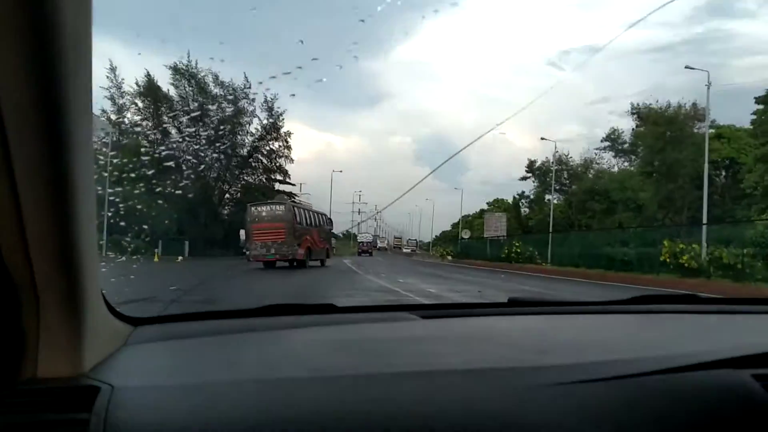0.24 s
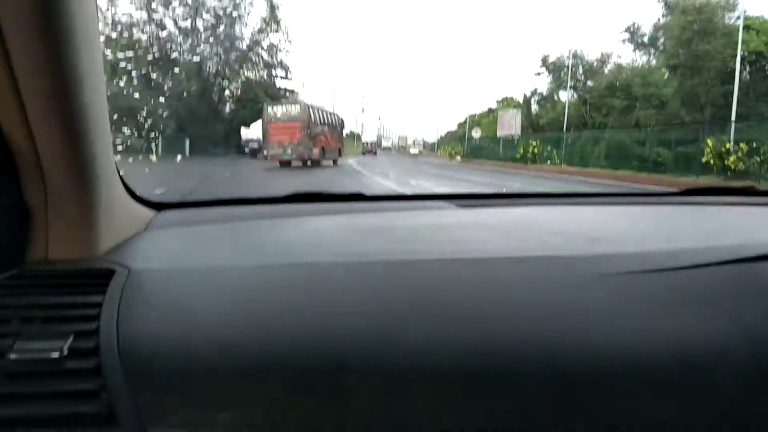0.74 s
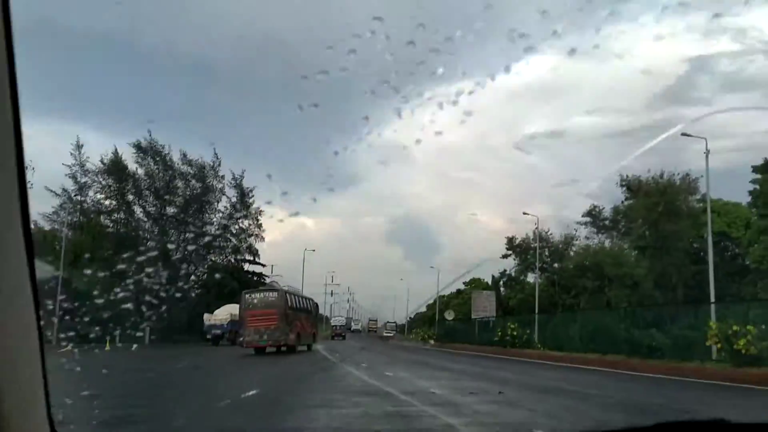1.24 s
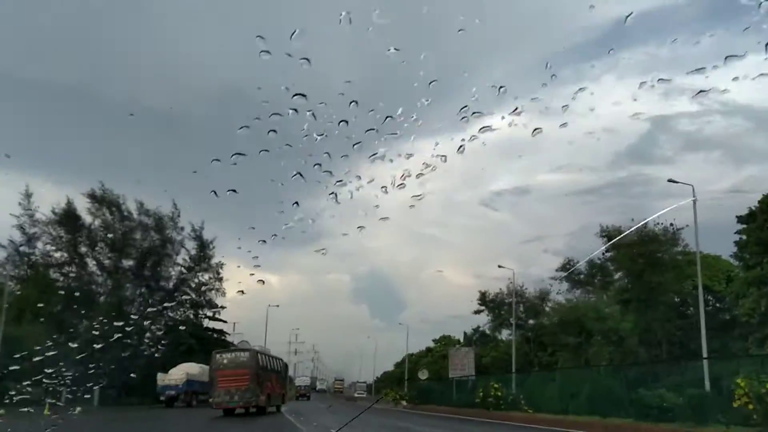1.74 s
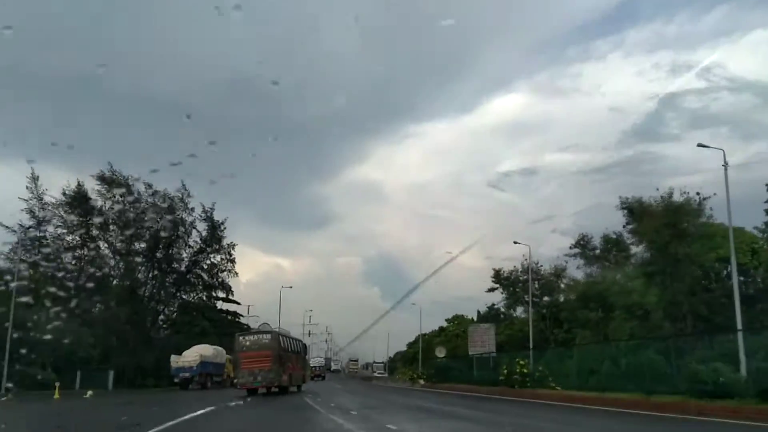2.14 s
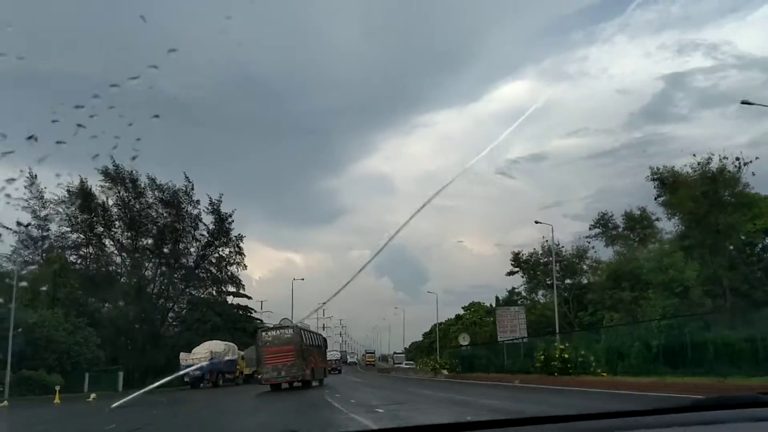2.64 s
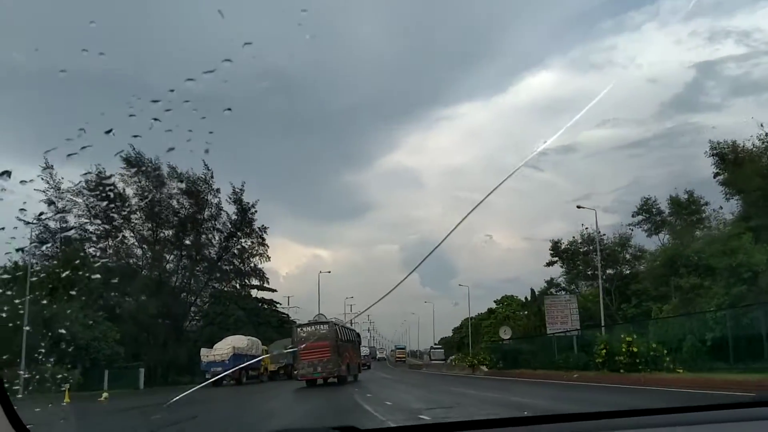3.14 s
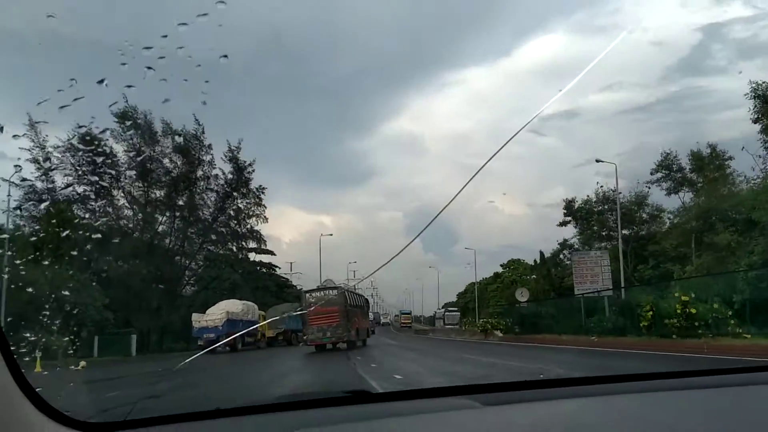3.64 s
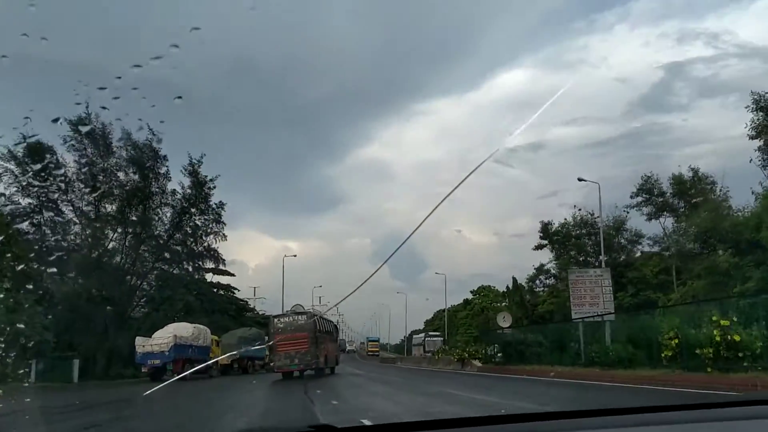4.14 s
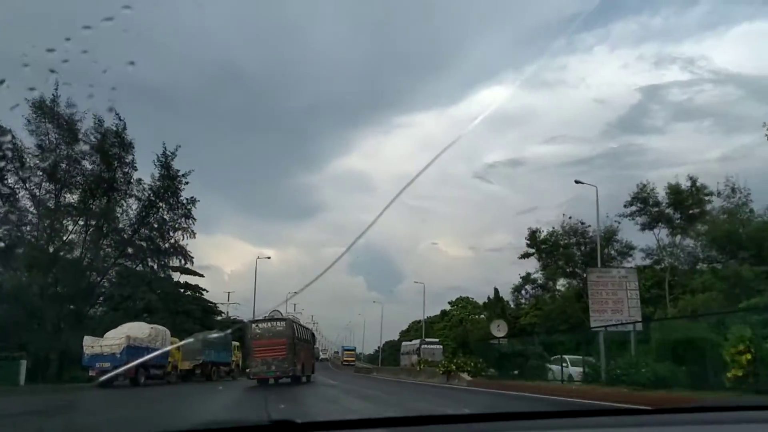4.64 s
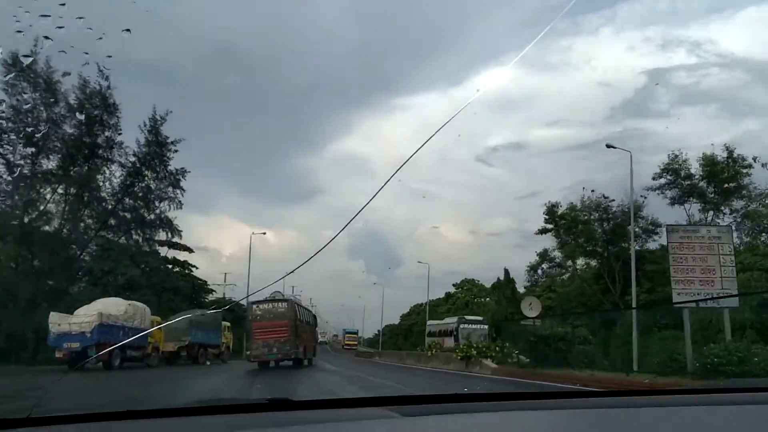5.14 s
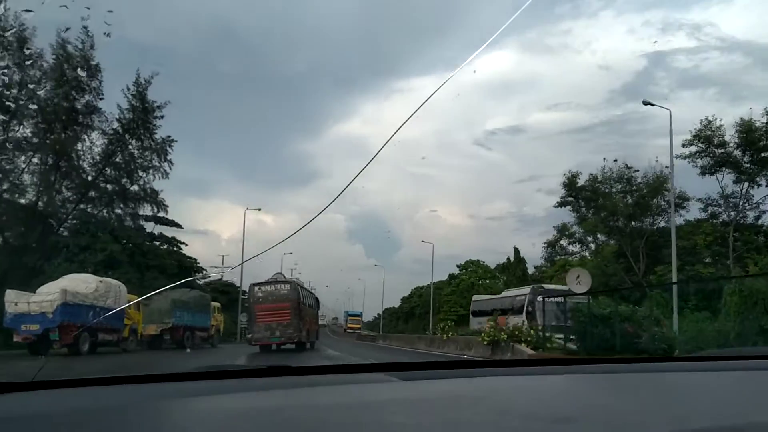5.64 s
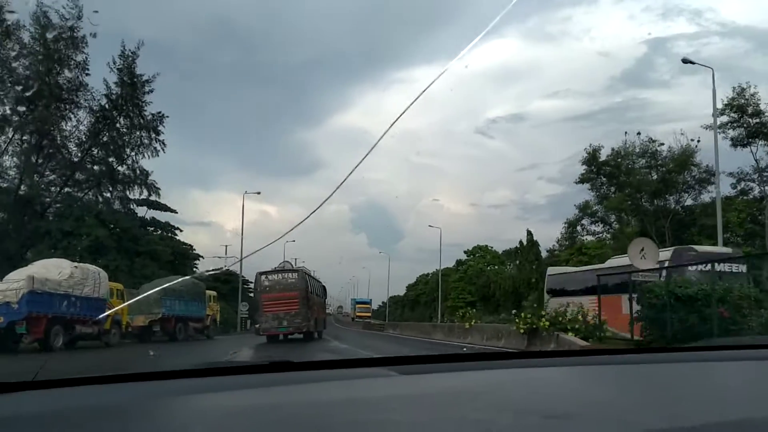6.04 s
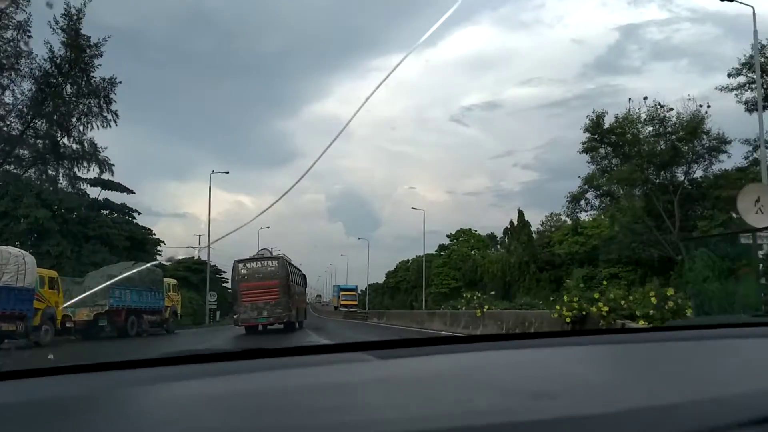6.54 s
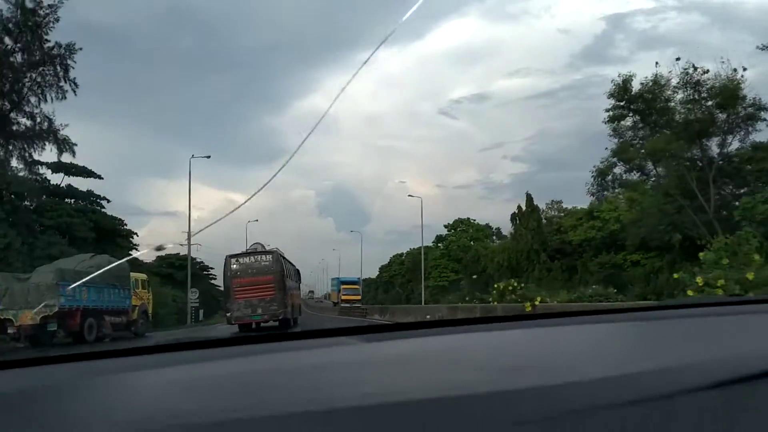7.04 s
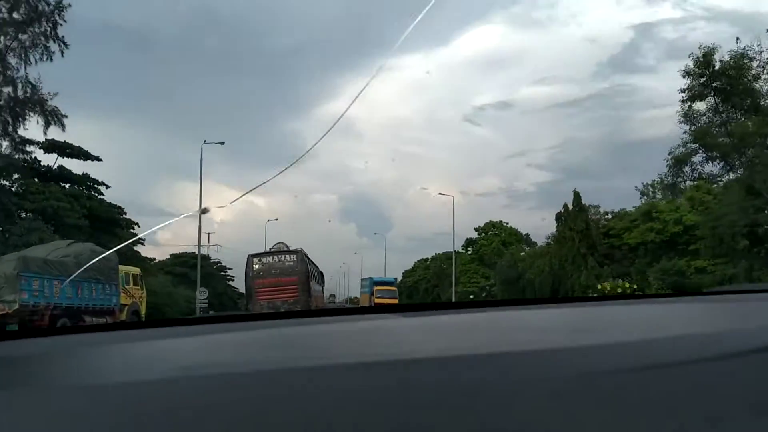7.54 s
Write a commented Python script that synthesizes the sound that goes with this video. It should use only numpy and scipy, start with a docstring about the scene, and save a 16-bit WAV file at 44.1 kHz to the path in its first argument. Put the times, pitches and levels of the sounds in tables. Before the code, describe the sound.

Car cabin road noise with a low engine hum; the car's own two-tone horn gives a single toot, a quick double, and later a longer one.

```python
"""Inside a car on a wet highway, heard by a hand-held phone with two microphone ports.
Shaped noise (tyre rumble, road roar, spray hiss) and a wavering engine hum run throughout. A far horn,
a thin stack of sines, sounds early on, with one brief far tone near 600 Hz. The car's two electric horns,
buzzing stacks with an echo, toot three times briefly as the phone is turned; another far horn, then one
long toot follow. Late on come low thumps and a passing vehicle's throbs and hum. A few things tick."""
import sys
import numpy as np
from scipy import signal
from scipy.fft import rfft, irfft
from scipy.io import wavfile
from scipy.ndimage import uniform_filter1d

SR = 44100
rng = np.random.default_rng(int(sys.argv[2]) if len(sys.argv) > 2 else 0)


def wav_out(sig):
    """Save sig, one row per channel (or a flat mono array), as 16-bit PCM at SR to the path in sys.argv[1]."""
    wavfile.write(sys.argv[1], SR, np.round(np.clip(np.atleast_2d(sig).T, -1, 1) * 32767).astype(np.int16))


N = 343539
STEP = 32  # samples between points of slow controls


def gain_of(db):
    """Decibels to a factor."""
    return 10 ** (np.asarray(db) / 20)


def evened(x):
    """Scales to rms 1."""
    return x / np.sqrt(np.mean(x ** 2) + 1e-20)


def read(points, hz, axis=1):
    """One column of a table, joined by straight lines on a log-frequency axis."""
    rows = np.transpose(points)
    return np.interp(np.log(hz + 1), np.log(rows[0] + 1), rows[axis])


def add(mix, s, sound):
    """Mixes a two-channel sound in at time s."""
    part = mix[:, round(s * SR):][:, :sound.shape[1]]
    part += sound[:, :part.shape[1]]


def stretched(slow):
    """Joins control points by straight lines at the full sample rate."""
    ramp = np.arange(STEP) / STEP
    lines = slow[..., :-1, None] + np.diff(slow)[..., None] * ramp
    return lines.reshape(slow.shape[:-1] + (-1,))


def wander(shape, hz):
    """Slow random curves of rms 1, one point a STEP, that change about hz times a second."""
    settling = 300  # points dropped while the filter settles
    raw = rng.standard_normal(shape[:-1] + (shape[-1] + settling,))
    smooth = signal.lfilter(*signal.butter(2, hz * 2 * STEP / SR), raw)
    return evened(smooth[..., settling:])


def paired(shape, hz, likeness):
    """Slow curves for both ports, alike by the given share."""
    a, b = wander((2,) + shape, hz)
    return np.array([a, likeness * a + np.sqrt(1 - likeness ** 2) * b])


# a toot builds up, sags while held, then rings out
ATTACK_S, ATTACK_DB, SAG_DB_PER_S = 0.022, -12, -9
RELEASE_DB_PER_S, RING_S = -400, 0.046
FALTER_AT_S, FALTER_DB, FALTER_HALF_S = 5.157, -8, .013  # the long toot dips briefly


def swing(t, start, held, db):
    """Loudness of one toot at times t from its start: attack, slow sag, ring-out."""
    level_db = db + ATTACK_DB * np.clip(1 - t / ATTACK_S, 0, 1) + SAG_DB_PER_S * t
    level_db = level_db + RELEASE_DB_PER_S * np.maximum(t - held, 0)
    level_db = level_db + FALTER_DB * np.exp(-((t + start - FALTER_AT_S) / FALTER_HALF_S) ** 2)
    opening = np.clip(t / 0.0032, 0, 1)
    closing = np.clip((held + RING_S - t) / 0.0069, 0, 1)
    return gain_of(level_db) * closing * opening


def lingering(size, t60):
    """A loudness curve smeared by an exponential tail that falls 60 dB in t60 seconds."""
    keep = gain_of(-2 * 60 / t60 * STEP / SR)  # power kept from one point to the next
    return np.sqrt(signal.lfilter([1 - keep], [1, -keep], size ** 2))


TURN_S = (1.07, 4.06)  # the phone is turned during this span
# how the two ports hear each pitch: (f/Hz, left-right likeness 0-1, left leads/rad)
PORTS = [(100, 0.92, 0.2), (400, 0.94, -0.13), (920, 0.91, 0.1), (1310, 1, 0.53), (1462, 0.22, 2.1),
         (1780, 0.13, -4), (2180, 0.1, -1), (2630, 0.88, -3), (2905, 1, -4.5), (3130, 0.93, -5.5),
         (3680, 0.38, -3), (3800, 0.93, -2.5), (3870, 0.96, -3.1), (4250, 0.2, -7), (7100, 0, 2.5)]
# balance between the ports before the turn and since: (f/Hz, left minus right/dB)
BEFORE = [(60, -3), (110, 2), (200, 4), (380, -11), (700, 6.5), (1290, 1.5), (2380, 6), (4400, 2),
          (8120, -0.5), (15000, 4)]
SINCE = [(60, -8), (110, -3.5), (200, -5), (380, 0.5), (700, 0.5), (1290, 5.5), (2380, 7.5), (4400, 1.5),
         (8120, 2.5), (15000, 16)]


def noise(size, before, since, level, patchy_db, gusty_db):
    """Random short-time spectra with drifting patches and wide gusts, through both ports, at a level curve."""
    hop = size // 4
    frames, hz = N // hop + 5, np.fft.rfftfreq(size, 1 / SR)
    frame_s = np.arange(frames) * hop / SR
    turned = np.clip((frame_s - TURN_S[0]) / (TURN_S[1] - TURN_S[0]), 0, 1)

    def blend(old, new):
        return np.outer(old, 1 - turned) + np.outer(new, turned)

    colour = gain_of(blend(read(before, hz), read(since, hz)))
    a, b, c, d, patches = rng.standard_normal((frames, len(hz), 5)).T
    patches = evened(uniform_filter1d(uniform_filter1d(patches, 10, 0), 8, 1))
    gusts = evened(uniform_filter1d(rng.standard_normal(frames), 8))
    # the right port hears partly the left's noise, shifted, and partly its own
    same = np.clip(read(PORTS, hz), 0, 1)[:, None]
    lag = np.exp(-1j * read(PORTS, hz, axis=2))[:, None]
    left = a + 1j * b
    right = same * left * lag + np.sqrt(1 - same ** 2) * (c + 1j * d)
    pan_db = blend(read(BEFORE, hz), read(SINCE, hz))
    spectra = np.array([left * gain_of(pan_db / 2), right * gain_of(-pan_db / 2)])
    spectra *= colour / np.linalg.norm(colour, axis=0)  # only the shape of the colour counts
    spectra *= gain_of(patchy_db * patches + gusty_db * gusts)
    sound = signal.istft(spectra, nperseg=size, noverlap=size - hop)[1]
    return sound[:, :N] * stretched(level)[:N]


# how loud the road is: (t/s, tyre rumble level/dB, road roar level/dB, spray hiss level/dB)
ROAD = [(0, -36.5, -39, -39), (.45, -33.5, -36, -38), (.95, -38, -39, -40), (1.6, -36, -38, -37),
        (2.1, -35.5, -36.5, -38), (2.4, -38.5, -44, -44.5), (3.1, -39.5, -44.5, -49),
        (4.0, -39.5, -45, -52), (5.0, -37, -42.5, -54), (5.3, -37, -39.5, -45.5), (5.8, -36.5, -40, -50),
        (6.5, -34.5, -39, -48), (6.8, -34, -37, -46), (7.0, -30, -34, -41.5), (7.25, -32, -34, -39),
        (7.45, -33.5, -35.5, -41), (7.6, -35, -35.5, -45.5), (7.79, -36.5, -38, -48)]
# colours of the noises, only relative: (f/Hz, level/dB); a pair is before and since the turn
RUMBLE = [(24, -52), (40, -3.5), (70, -23), (90, -0.5), (118, 5.5), (162, -3.5), (258, -3.5), (391, -14),
          (415, -6.5), (450, -27), (580, -17), (990, -120)], [(24, -79), (40, -16.5), (68, -29.5), (92, 1),
          (200, -6.5), (248, -4), (277, -11.5), (313, -4), (391, -11), (450, -14.5), (580, -59),
          (990, -120)]  # pair
ROAR = ([(150, -48), (420, -3.5), (600, 0.5), (1000, -3.5), (1250, -3), (1650, -2.5), (2200, -1.5),
        (2700, -8), (3500, -37), (6000, -90)], [(150, -34), (420, -4), (600, 0), (1050, -2), (1250, -6.5),
        (1650, -3.5), (2200, -10.5), (2700, -16), (3500, -37), (6000, -92)])  # pair
HISS = [(1000, -59), (1800, -33), (2600, -1), (3300, -4.5), (3850, -3), (4300, -4), (6000, -4.5),
        (7900, -9), (8250, -48), (9500, -82)]
AIR = ([(7000, -72), (7800, -32), (8500, -3.5), (9300, -2.5), (11000, -6.5), (13000, -12), (14500, -15),
       (15500, -30)], [(7000, -72), (7800, -30), (8500, -11.5), (9300, -8.5), (11000, -14.5), (12500, -22),
       (13500, -24), (15500, -51)])  # pair
# a narrow hum in the traffic alongside, relative: (f/Hz, level/dB)
DRONE = [(400, -90), (570, -2.5), (625, -2.5), (900, -120)]
DRONE_AT_S, DRONE_HALF_S, DRONE_DB = 6.91, 0.16, -43  # its one swell
AIR_DB, AIR_FOLLOWS = -64, 1.16  # top air at -40 dB of hiss, and dB it moves for each dB of hiss
SHAKE_DB = -15  # the horns shake the bodywork: low rumble under the toot
# the horn also comes back as noise scattered by the roadside: dB relative to the toot
SCATTER_ROAR_DB, SCATTER_HISS_DB, SCATTER_T60_S = -13.5, -7, 0.71


def road():
    """Tyre rumble, road roar, spray hiss, thin top air and a passing hum; scattered horn sound swells them."""
    t = np.arange(0, N + 2 * STEP, STEP) / SR
    times, *levels_db = np.transpose(ROAD)
    rumble, roar, hiss = (gain_of(np.interp(t, times, db)) for db in levels_db)
    for start, held, db, treble_db, *_ in TOOTS:
        scatter = lingering(swing(np.maximum(t - start, 0), start, held, db), SCATTER_T60_S)
        rumble = np.hypot(rumble, gain_of(SHAKE_DB) * scatter)
        roar = np.hypot(roar, gain_of(SCATTER_ROAR_DB) * scatter)
        hiss = np.hypot(hiss, gain_of(SCATTER_HISS_DB + treble_db) * scatter)
    air = gain_of(AIR_DB) * (100 * hiss) ** AIR_FOLLOWS
    drone = gain_of(DRONE_DB) * np.exp(-((t - DRONE_AT_S) / DRONE_HALF_S) ** 4)
    mix = noise(1024, DRONE, DRONE, drone, patchy_db=2.5, gusty_db=4.0)
    mix += noise(4096, *RUMBLE, rumble, patchy_db=2.0, gusty_db=1.5)
    mix += noise(1024, *ROAR, roar, patchy_db=0.8, gusty_db=0.68)
    mix += noise(512, HISS, HISS, hiss, patchy_db=1.56, gusty_db=0.54)
    mix += noise(512, *AIR, air, patchy_db=3.0, gusty_db=-0.5)
    return mix


# the engine's firing rate before its small wavering: (t/s, f/Hz, level/dB)
ENGINE = [(0, 83, -39), (.4, 88, -42.5), (.55, 75, -46), (1.299, 68, -47.5), (2.099, 71.5, -45.5),
          (2.6, 76.5, -49), (3.501, 80.5, -48), (4.3, 83, -55), (5.001, 86, -47), (5.748, 81.5, -48.5),
          (6.5, 76, -51), (7.05, 72, -46), (7.79, 72, -45)]
# tones at whole multiples of the firing rate: (multiple, level/dB added)
ENGINE_ORDERS = [(1, -4), (3, -1), (4, -8), (5, -5.5), (6, -16.5)]
ENGINE_PAN_DB = 1  # left minus right


def engine():
    """A few wavering engine orders that stand out of the rumble as the revs rise and fall."""
    s, hz, db = np.transpose(ENGINE)
    t = np.arange(s[0], s[-1], STEP / SR)
    order, order_db = np.array(ENGINE_ORDERS).T[..., None]
    pitch = np.interp(t, s, hz) * (1 + 0.0044 * wander(t.shape, 3.7))
    size = gain_of(np.interp(t, s, db) + order_db + 4.1 * wander((len(order), len(t)), 1.09))
    turns = np.round(order) * np.cumsum(stretched(pitch)) / SR
    tone = (stretched(size) * np.sin(2 * np.pi * turns)).sum(0)
    return s[0], tone * gain_of(np.array([[.5], [-.5]]) * ENGINE_PAN_DB)


# low thumps over road joints near 110-120 Hz, and short throbs of a passing vehicle near 200-220 Hz:
# (t/s, level/dB before the soft onset and decay, f/Hz, time to fall 60 dB/s)
LOW_BURSTS = [(0.441, -12, 111, 0.13), (6.766, -18, 120, 0.11), (6.961, -13, 115, 0.1),
              (7.14, -21.5, 206, 0.21), (7.285, -17.5, 205, .15), (7.392, -19, 201, .12),
              (7.468, -9.5, 111, 0.15), (7.518, -23, 218, 0.098)]


def low_burst(db, hz, t60):
    """A thump or a throb: a decaying low sine with a soft onset, alike at both ports."""
    t = np.arange(int(.25 * SR)) / SR
    onset = 1 - np.exp(-t / 0.023)
    burst = np.sin(2 * np.pi * hz * t) * onset * gain_of(db - 60 * t / t60)
    return np.array([burst, burst])


# things ticking in the cabin:
# (t/s, snap level/dB before its fade, left minus right/dB, snap's time to fall 60 dB/s, knock level/dB)
TICKS = [(0.339, -30, -16, .012, -40), (3.2891, -38, 3.0, .012, -50), (3.5192, -44.5, 1.5, .01, -55),
         (4.5994, -47.5, 1.0, .01, -55), (6.531, -39, 7, .04, -50), (7.3777, -13, 10, .0045, -19)]
# wide resonances of the trim: (f/Hz, width/Hz, level/dB relative)
TICK_MODES = [(2600, 1800, -6), (4730, 790, 1), (5700, 1200, 0), (7160, 1400, -2), (9450, 3600, -27),
              (13000, 4000, -26)]
KNOCK_HZ, KNOCK_T60_S = 1050, 0.0031  # the panel behind the trim


def tick(db, pan_db, t60, knock_db):
    """A short burst of noise in a few wide modes of the trim, over a dull knock."""
    t = np.arange(2048) / SR
    hz = np.fft.rfftfreq(2048, 1 / SR)
    colour = sum(gain_of(g) / (1 + ((hz - f) / w * 2) ** 4) for f, w, g in TICK_MODES)
    shared, own = rng.standard_normal(2048), rng.standard_normal((2, 2048))
    fade = gain_of(-60 * t / t60) * (1 - np.exp(-t / 0.00071))
    burst = irfft(rfft(shared + 0.82 * own) * colour) * fade
    burst = evened(burst) * np.sqrt(np.mean(fade ** 2))
    knock = np.sin(2 * np.pi * KNOCK_HZ * t) * gain_of(knock_db - 60 * t / KNOCK_T60_S)
    return burst * gain_of(db + np.array([[.5], [-.5]]) * pan_db) + knock


# two far horns and a brief far tone, one table each, before wavering:
# (t/s, f/Hz of the first partial, level/dB, added above third partial/dB)
FAR = [
    [(0, 428.7, -48.5, 0), (.7, 428, -47, 7), (.9, 427, -46, 8), (.94, 427, -48, -6), (.99, 426, -49, -6),
     (1.01, 426, -49, 17), (1.09, 427, -45, 12), (1.15, 427, -41, -0.5), (1.7, 420.5, -48, 1),
     (2.2, 418, -63, -1)],
    [(2.69, 372, -64, 10), (2.72, 375, -51, 10), (2.765, 372, -49, 10), (2.795, 364, -44, 0),
     (2.84, 377, -40, -13), (2.885, 374, -51, -8), (2.96, 370, -54, -14), (3.0, 369, -66, -14)],
    [(.52, 609, -65, 0), (.58, 597, -44, 0), (.64, 594, -43, 0), (.72, 580, -58, 0)],
]
# the partials of each: (partial, level/dB added); the brief tone has only one
FAR_TONE = [
    [(1, -3), (2, -2.5), (3, -3), (4, -5), (5, -14)],
    [(2, 5), (4, -4), (5, -13), (8, -17), (9, -17)],
    [(1, 5.5)],
]


def far_sound(rows, tone):
    """A thin stack of sines, or a single one, that blurs and flutters on its way through traffic."""
    s, hz, db, bright_db = np.transpose(rows)
    t = np.arange(s[0], s[-1], STEP / SR)
    order, tone_db = np.array(tone).T[..., None]
    pitch = np.interp(t, s, hz) * (1 + 0.0049 * wander(t.shape, 23.0))
    turns = np.round(order) * np.cumsum(stretched(pitch)) / SR + rng.random(order.shape)
    # part of the flutter is common to both ports, part is each port's own
    flutter_db = 3.2 * wander((len(tone), len(t)), 30) + 2.0 * wander((2, len(tone), len(t)), 16)
    level_db = np.interp(t, s, db) + (order > 3.5) * np.interp(t, s, bright_db)
    size = gain_of(tone_db + flutter_db + level_db)
    return s[0], (stretched(size) * np.sin(2 * np.pi * turns)).sum(1)


HORN_HZ = (431.8, 503.5)  # the low and the high horn, once settled
HORN_LATE_S = (0.013, 0.00086)  # the heavier low horn speaks a little later
START_FLAT, SETTLE_S = 0.0216, 0.0357  # share of the pitch each toot starts flat by, and how soon it settles
FLUTTER_DB, FLUTTER_GROWTH, FAST_SHARE = 3.2, .015, .3  # wavering, its growth per partial, quick part added
BUZZ = .014  # roughness of a partial for each partial number
ECHO_FUZZ_HZ, ECHO_LOW_HZ = 17, 580  # how fast the echo breaks up; the roadside returns little below
# one row a toot: (start t/s, held/s, level/dB, added above sixteenth partial/dB, roadside echo level/dB,
# echo delay/s, echo's time to fall 60 dB/s, echo flat by/share of pitch, rattle level/dB relative to toot)
TOOTS = [(1.172, 0.096, -20.5, -2.5, -7.5, 0.028, 0.71, 0.0084, -31),
         (1.698, 0.08, -21, -3.5, -4.5, 0.027, 0.3, 0.01, -32),
         (1.878, 0.1, -20.5, -6.5, -9, 0.083, 0.12, .02, -38),
         (5.066, 0.23, -17, -23.5, -9.5, 0.027, 0.11, 0.0074, -19)]
# the horns' colour, one table a toot, as the phone is held then:
# (partial, low horn left level/dB, right level/dB, high horn left level/dB, right level/dB)
BODY = [
    [(1.0, -5.5, -9, -9, -4.5), (2.0, -8.5, -2.5, -4, -8.5), (3.0, -6.5, -5.5, -5, -5),
     (4.0, -12, -5, 2, -6.5), (5.0, -3, -19, -8.5, -18), (6.0, -15, -27.0, -22, -17),
     (7.0, -6, -5.5, -17, -24), (8.0, -10, -25, -27, -24), (9.0, -22, -20, -31.5, -20),
     (10.0, -21, -27, -19.5, -25), (11.0, -18, -28, -28, -12.5), (12.0, -31, -28, -29.5, -31.5),
     (13.0, -18, -17.5, -29.0, -22), (14.0, -9, -23, -23, -15), (15.0, -26.0, -9, -31.5, -17),
     (16.0, -31, -16, -50.0, -35)],
    [(1.0, -15, -11, -2.5, -0.5), (2.0, -7, -2.5, -24, -17), (3.0, -11, -10.5, -2.5, -7),
     (4.0, -2, -0.5, 1.5, -1), (5.0, -2, -15, -3.5, -15), (6.0, -7, -18.5, -29, -28),
     (7.0, -9, -12, -20, -34.5), (8.0, -13, -14, -18, -26), (9.0, -24.0, -21.0, -29, -19),
     (10.0, -22, -17, -22, -31.5), (11.0, -28.5, -23, -23.0, -26), (12.0, -32, -37, -34.5, -37.5),
     (13.0, -10, -16, -27.5, -31), (14.0, -11, -28, -27.0, -28), (15.0, -15, -7.5, -29, -33),
     (16.0, -18, -14, -35, -38.0)],
    [(1.0, -15, -26, -4.5, -2), (2.0, -17.0, -9.5, -12.5, -16), (3.0, -13, -16, -4, 1.5),
     (4.0, 0, -11, -6, -5), (5.0, -4.5, -18, -13, -19), (6.0, -9.5, -31, -26, -33),
     (7.0, -7.5, -15.0, -22, -27.0), (8.0, -23, -18.5, -19, -32.5), (9.0, -18, -23, -17, -26.0),
     (10.0, -31, -24, -23, -33.0), (11.0, -31.0, -22, -23, -35), (12.0, -29, -33.0, -34.5, -29),
     (13.0, -17, -32.0, -33, -34), (14.0, -19, -18, -34, -30), (15.0, -21, -8, -44, -33),
     (16.0, -32.5, -21, -50.0, -46.5)],
    [(1.0, -13.5, -15, -6.5, -7), (2.0, -7.5, -11, -11, -11), (3.0, -10.5, -17, -15, -1),
     (4.0, -11, -11, -8.5, -17), (5.0, -11.5, -21, -16.5, -30.5), (6.0, -12.5, -27.5, -23, -34),
     (7.0, -12, -19, -26, -35), (8.0, -22, -33.0, -32, -43.5), (9.0, -27, -46, -39, -40),
     (10.0, -37, -40, -33, -28), (11.0, -38, -38.5, -28, -29.5), (12.0, -34, -36, -43.0, -37),
     (13.0, -41, -36, -46, -30), (14.0, -35, -24.5, -45.5, -33), (15.0, -31, -31, -50.0, -50.0),
     (16.0, -36.0, -42, -50.0, -50.0)],
]
# higher partials for all toots, same columns, before each toot's own treble setting
TREBLE = [(17, -12, -28, -43, -50), (18, -32, -17, -27, -40), (19, -20.5, -37, -50, -30.5),
          (20, -41, -25, -66, -62), (21, -38, -45, -36, -51), (22, -37, -62, -57, -73),
          (23, -30, -33, -52, -55), (24, -53, -62, -61.5, -46)]
# the long toot's colour once it picks up again after its dip, same columns
AFTER_FALTER = [(1.0, -20, -18, -9, -6), (2.0, -8, -9.5, -20, -15.5), (3.0, -9, -12.5, -21, -1.5),
                (4.0, -7.5, -8, -7.5, -14), (5.0, -15, -17, -18.5, -29), (6.0, -14, -34.5, -30, -25),
                (7.0, -14.5, -21, -22.5, -40.0), (8.0, -21, -32, -31, -34), (9.0, -40, -41, -36, -40.0),
                (10.0, -38.5, -44.5, -36, -32), (11.0, -44.5, -43, -36, -42),
                (12.0, -42.5, -42.0, -44.5, -45.0), (13.0, -40.0, -38.5, -42.5, -42.5),
                (14.0, -32, -35, -46.5, -42), (15.0, -41, -35, -50.0, -50.0),
                (16.0, -43.0, -43.5, -53, -55)]
# what the roadside sends back, one table a toot: (f/Hz, level/dB added)
ECHO_TONE = [
    [(500, 2.5), (1300, 4), (2000, 0.5), (3100, 5), (4000, 10), (6000, 1)],
    [(500, -0.5), (1300, 6), (2000, -4), (3100, -0.5), (4000, 0), (6000, -1)],
    [(500, 0), (1300, 8), (1600, -7), (2200, 0), (3000, 5), (3450, 16), (4000, 2), (6000, 0)],
    [(500, 4.5), (1300, -2), (2000, -4), (3100, -1), (4000, 10), (6000, 13.5)],
]
# one row for the low horn, one for the high: left leads/rad, partial by partial; the last holds above
HORN_LEAD = ((0.5, .5, -0.2, 1.65, -1.5, 5, 2.0, 2.5, 3.5, -1.1, -2.5, 3.0, 2.5, 1.2, -.7, 1.2),
             (.1, 0.3, 0, 2.5, 5, 3, -1.5, -1.1))


def toot(row, body, echo_tone):
    """Two buzzing diaphragms start flat and settle; each partial fades in and out as cabin reflections shift.
    The roadside slides past, so its echo is a late, fuzzy copy of every partial."""
    start, held, db, treble_db, echo_db, echo_s, t60, echo_flat, rattle_db = row
    t = np.arange(0, .55, STEP / SR)
    press = swing(t, start, held, db)
    late = lingering(np.interp(t - echo_s, t, press, left=0), t60)
    # the topmost partials share one faint level
    top = [(TREBLE[-1][0] + k, *(np.array(TREBLE[-3][1:]) - 8)) for k in range(1, 9)]
    upper = [(k, *(np.array(v) + treble_db)) for k, *v in TREBLE + top]
    table, after = np.array(list(body) + upper), np.array(list(AFTER_FALTER) + upper)
    resumed = np.clip((t + start - FALTER_AT_S) / FALTER_HALF_S / 2 + .5, 0, 1)
    order, out = np.round(table[:, :1]), 0
    shape = (len(order), len(t))
    for horn, hz in enumerate(HORN_HZ):
        partial_hz = order * hz
        settling = START_FLAT * np.exp(-(t / SETTLE_S) ** 2)
        pitch = hz * (1 - settling + 0.0022 * wander(t.shape, 33.0))
        like = np.clip(read(PORTS, partial_hz), 0, 1)

        uneven_db = FLUTTER_DB * (1 + FLUTTER_GROWTH * order)  # short waves feel the reflections more
        shifting = paired(shape, 11, like) + FAST_SHARE * paired(shape, 56, like)
        shifting = gain_of(uneven_db * shifting)
        mean_power = np.average(shifting ** 2, axis=2, weights=press ** 2)
        shifting = shifting / np.sqrt(mean_power)[..., None]  # no lasting change of colour
        buzz = 1 + BUZZ * order * (wander(shape, 130) + 1j * wander(shape, 130))
        # the buzz brightens as the swing grows: high partials rise more slowly
        speaks = np.clip((t - HORN_LATE_S[horn]) / (0.0027 + 0.002 * order), 0, 1)
        direct = press * speaks * shifting * buzz

        fuzz = paired(shape, ECHO_FUZZ_HZ, like) + 1j * paired(shape, ECHO_FUZZ_HZ, like)
        dull = 1 / np.sqrt(2 + 2 * (partial_hz / 4000) ** 2)
        dull = dull / np.sqrt(1 + (ECHO_LOW_HZ / partial_hz) ** 4)
        flattened = np.exp(-2j * np.pi * echo_flat * partial_hz * t)
        echo = gain_of(echo_db + read(echo_tone, partial_hz)) * late * dull * fuzz * flattened

        lead = np.take(HORN_LEAD[horn], order.astype(int) - 1, mode="clip")
        lag = np.array([0 * order, lead])
        columns = slice(1 + 2 * horn, 3 + 2 * horn)
        first_db, then_db = (rows[:, columns].T[..., None] for rows in (table, after))
        size = gain_of(first_db + (then_db - first_db) * resumed) * np.exp(-1j * lag)
        turns = order * np.cumsum(stretched(pitch)) / SR + rng.random(order.shape)
        waves = stretched(size * (direct + echo)) * np.exp(2j * np.pi * turns)
        out = out + np.sqrt(2) * waves.real.sum(1)
    # loose parts rattle along: fast random modulation spreads noise between the partials
    shake = signal.lfilter(*signal.butter(2, 220 / SR * 2), rng.standard_normal(out.shape[1]))
    return start, out * (1 + gain_of(rattle_db) * evened(shake))


def scene():
    """Everything heard in the cabin, from the background to the horns."""
    mix = road()
    add(mix, *engine())
    for s, *row in LOW_BURSTS:
        add(mix, s, low_burst(*row))
    for s, *row in TICKS:
        add(mix, s, tick(*row))
    for parts in zip(FAR, FAR_TONE):
        add(mix, *far_sound(*parts))
    for parts in zip(TOOTS, BODY, ECHO_TONE):
        add(mix, *toot(*parts))
    return mix


EDGE_HZ = 15650  # little passes above


def record(dry):
    """The phone's bass cut and band limit."""
    cut = signal.sosfilt(signal.butter(2, 60, "high", fs=SR, output="sos"), dry)
    band = signal.firwin(1501, EDGE_HZ, window=("kaiser", 9), fs=SR)
    return signal.oaconvolve(cut, band[None], "same")


dry = scene()
out = record(dry)
wav_out(out)
```